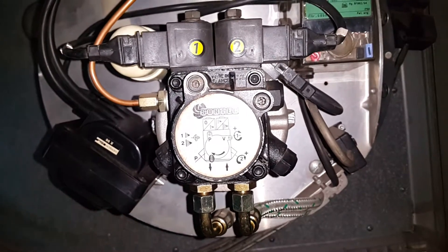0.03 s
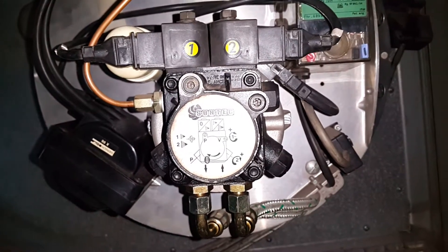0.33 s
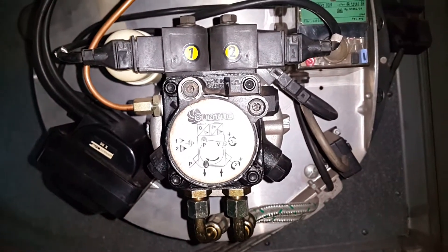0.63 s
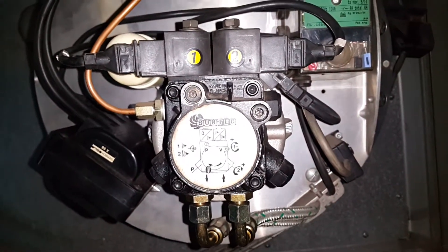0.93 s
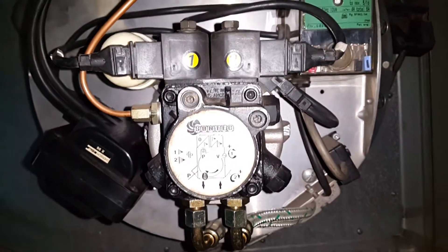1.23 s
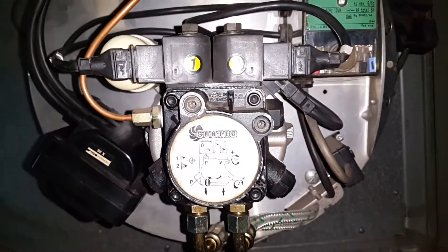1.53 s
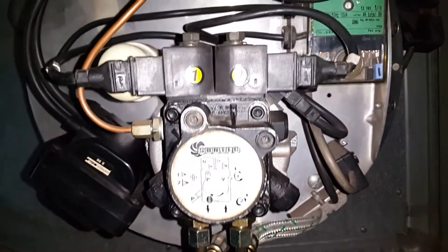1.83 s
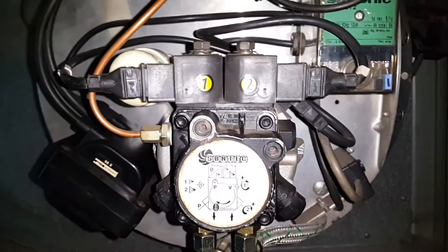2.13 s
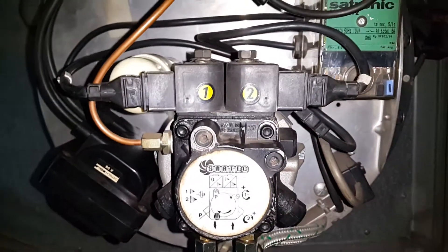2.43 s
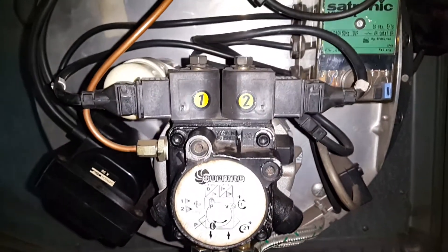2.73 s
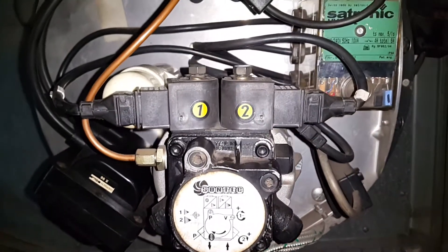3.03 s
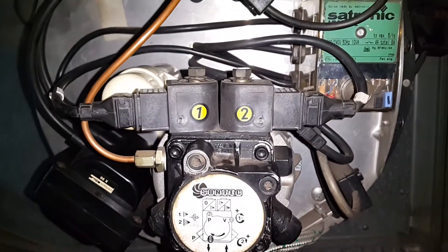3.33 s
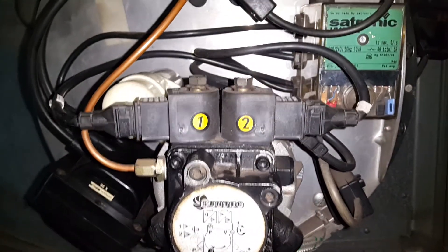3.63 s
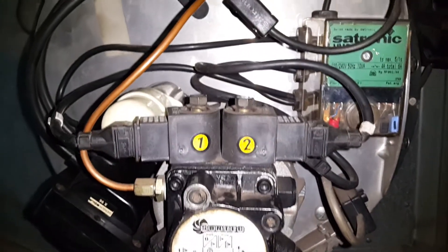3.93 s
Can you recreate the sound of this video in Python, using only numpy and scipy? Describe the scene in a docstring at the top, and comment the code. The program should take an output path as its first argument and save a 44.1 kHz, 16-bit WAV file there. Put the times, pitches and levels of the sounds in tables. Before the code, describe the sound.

Close up in a boiler room, an oil burner gives a low roar and a booming hum, with rushing air, faint whines and rapid pump ticking. The flame then falls abruptly to a low fire, leaving mostly the fan.

```python
"""A boiler room, with an oil burner running close by.
Its flame roars and makes the firebox boom near 313 Hz, then drops suddenly to a low fire at 2.85 s.
The fan rushes steadily through its housing; the motor and oil pump add thin whines and fine, fast ticks.
The right microphone faces away, and its sound gets duller after a second."""
import sys
import numpy as np
from scipy import signal
from scipy.fft import rfft, irfft
from scipy.io import wavfile

SR = 44100
rng = np.random.default_rng(int(sys.argv[2]) if len(sys.argv) > 2 else 0)


def wrap_up_sound(samples):
    """Save the sound to the file named by the first command line argument, as 16-bit audio."""
    columns = np.atleast_2d(samples).T
    # keep every value between -1 and 1, then stretch to whole-number steps
    tamed = np.clip(columns, -1, 1)
    steps = np.round(tamed * 32767).astype(np.int16)
    wavfile.write(sys.argv[1], SR, steps)


N = 176400
T, HZ = np.arange(N) / SR, np.fft.rfftfreq(N, 1 / SR)

# How strongly the fire burns: time_s, gain_db
FIRE_STRENGTH = [(0, -1), (1.0, 0), (1.6, -1.3), (2.15, 1), (2.4, -1), (2.7, 1), (2.835, 0), (2.86, -10),
                 (4, -12)]


def amp(db):
    """Turns decibels into a number to multiply by."""
    return 10 ** (np.asarray(db) / 20)


def unit(x):
    """Scales a signal to an average size (rms) of 1."""
    return x / np.sqrt(np.mean(abs(x) ** 2) + 1e-30)


def over_hz(table, column=1):
    """Reads a table's column at every frequency, joining the points on a log scale."""
    columns = np.transpose(table)
    return np.interp(np.log(HZ + 1), np.log(columns[0] + 1), columns[column])


def over_time(table):
    """Reads a table at every sample, joining the points with straight lines."""
    return np.interp(T, *np.transpose(table))


def colour(x, gain):
    """Makes each frequency louder or softer by its own gain."""
    return irfft(rfft(x) * gain, N)


def drift(rate_hz):
    """A smooth random wobble of size 1; a higher rate makes it quicker."""
    return unit(colour(rng.standard_normal(N), np.exp(-(HZ / rate_hz) ** 2) * (HZ > 0)))


def air_noise():
    """An even hiss (0 dB per Hz) at both microphones, nearly the same in the bass."""
    # How alike the two sides are, from 0 to 1: pitch_hz, likeness
    side_likeness = [(50, 0.9), (130, 0.88), (320, 1), (560, 0.85), (800, 0.9), (1300, 0), (4000, .05)]
    left, other = rng.standard_normal((2, N)) * np.sqrt(SR / 2)
    alike = np.clip(over_hz(side_likeness), 0, 1)
    right = colour(left, alike) + colour(other, np.sqrt(1 - alike ** 2))
    return np.array([left, right])


def pump_ticks():
    """The motor and pump tick strong, weak, strong, weak; the same ticks come round with each turn."""
    # Tone of a tick: pitch_hz, gain_db
    tick_tone = [(1000, -32), (4500, -3.5), (6000, 4), (6900, -3.5), (8000, -1), (9500, -13), (15000, -24)]
    first_s, pairs_per_s, decay_s = 0.0068, 115.13, 0.0004
    level_db, weak_tick_db = -58.5, -4.5
    ticks_per_turn, length = 12, 128
    fade = np.exp(-np.arange(length) / SR / decay_s)
    clicks = rng.standard_normal((ticks_per_turn, 2, length)) * fade
    ticks = np.zeros((2, N + length))
    for k, start_s in enumerate(np.arange(first_s, N / SR, 0.5 / pairs_per_s)):
        start = int(start_s * SR)
        gain_db = weak_tick_db * (k % 2) + rng.standard_normal()  # uneven by about 1 dB
        ticks[:, start:start + length] += clicks[k % ticks_per_turn] * amp(gain_db)
    return amp(level_db) * unit(colour(ticks[:, :N], amp(over_hz(tick_tone))))


def motor_whines():
    """The motor and pump sing thin tones that waver together with the speed of the shaft."""
    # One row for each whine, before the boost: pitch_hz, level_db
    whines = [(2331, -64), (2622, -61), (2744, -64.5), (3683, -60.5), (4856, -69), (5276, -64), (5776, -70),
              (5966, -75), (6007, -67), (6196, -74.5), (6428, -74), (6659, -77), (6890, -73), (7118, -77.5),
              (7386, -81.5), (7849, -79), (8080, -82), (9232, -85)]
    boost_db, speed_wobble = 7.5, 0.00043
    shaft_time = np.cumsum(1 + speed_wobble * drift(rate_hz=4.2)) / SR
    tones = np.zeros((2, N))
    for pitch_hz, level_db in whines:
        loudness = amp(level_db + boost_db + drift(rate_hz=3))  # swells and fades by about 1 dB
        cycles = pitch_hz * shaft_time + rng.random((2, 1))
        tones += loudness * np.sin(2 * np.pi * cycles)
    return tones


def fan_rush():
    """The fan blows swirling air, coloured by its housing, the room and where the microphones are."""
    # Basic tone of the rushing air: pitch_hz, level_db
    rush_tone = [(20, -93), (70, -73), (130, -55), (200, -59.5), (260, -49.5), (330, -57), (400, -63.5),
                 (500, -58.5), (680, -59.5), (800, -60), (1000, -61), (1130, -61.5), (1230, -72),
                 (1600, -69.5), (2050, -72.5), (2500, -71), (3200, -73.5), (3650, -74), (4050, -78.5),
                 (4600, -78), (5250, -76.5), (5700, -83), (6400, -91), (7500, -94.5), (8600, -96.5),
                 (9800, -92.5), (11000, -94), (11800, -97), (12400, -96.5), (14300, -99), (15600, -99)]
    # Pitches at which the housing and air ducts ring: pitch_hz, width_hz, lift_db
    housing_rings = [(360, 25, 10), (452, 15, 4), (533.5, 29, 5), (565.8, 44, 8.5), (615.4, 47, 6.5),
                     (817, 35, -3.5), (859, 50, 4.5), (1370, 106, 8), (1464, 53, 9), (1728, 41, 5),
                     (2320, 70, 1), (2620, 65, 5), (2750, 70, 0.5), (2950, 50, -0.5), (3560, 66, 2.5)]
    # How the tone changes as the microphones are raised: pitch_hz, change_db
    raised_tone = [(300, 4), (430, -0.5), (580, 0), (720, -1.5), (870, 1.5), (1150, -0.5), (1370, 1),
                   (1470, 4), (1600, -0.5), (1900, -1), (2600, -3.5), (3100, -1), (3600, 3), (4700, -3),
                   (6800, -1.5), (10000, 1)]
    # How much of that change is heard (below zero it works in reverse): time_s, share
    raised_share = [(0, -0.41), (1.8, -0.4), (2.3, 0.15), (4, 0.65)]
    ripple_size_db, ripple_step_hz, flutter_db = 0.8, 22.07, 0.44
    housing_db = sum(db / (1 + (2 * (HZ - hz) / width) ** 4) for hz, width, db in housing_rings)
    # Standing waves in the room make some pitches a little louder and others softer.
    ripples = rng.standard_normal((2, 4000))
    room = np.array([np.interp(HZ / ripple_step_hz, np.arange(len(side)), side) for side in ripples])
    rush = colour(air_noise(), amp(over_hz(rush_tone) + housing_db + ripple_size_db * room))
    tone_change = colour(rush, np.log(amp(over_hz(raised_tone))))
    rush = rush + over_time(raised_share) * tone_change
    return rush * amp(flutter_db * drift(rate_hz=25))  # swirling air makes the level flutter


def firebox_boom():
    """The flame keeps the firebox ringing: a wavering tone at full fire, mostly a noisy hum at low fire."""
    # How the boom swells and sinks, before the trim: time_s, level_db
    boom_swells = [(0.03, -11.5), (0.33, -20.5), (0.49, -11.5), (0.87, -20), (1.11, -13.5), (1.25, -19.5),
                   (1.42, -9), (1.53, -24.5), (1.81, -15), (2.09, -23), (2.34, -16.5), (2.73, -16),
                   (2.85, -36), (3.08, -23.2), (3.37, -21), (3.47, -26.5), (3.77, -20), (3.96, -24)]
    pitch_hz, wobble_hz, trim_db = 313.7, 3.76, -2.5
    width_hz, edge_hz = 22, 34
    noise_at_full_fire, noise_at_low_fire = 0.27, 0.85  # shares of the boom's power
    # Keep only the noise close to the firebox's own pitch.
    away_hz = np.fft.fftfreq(N, 1 / SR) - pitch_hz
    narrow_band = 1 / (1 + 2j * away_hz / width_hz) / (1 + (away_hz / edge_hz) ** 2)
    hum = unit(np.fft.ifft(np.fft.fft(rng.standard_normal(N)) * narrow_band).real)
    wavering_hz = pitch_hz + wobble_hz * drift(rate_hz=6.04)
    tone = unit(np.sin(2 * np.pi * np.cumsum(wavering_hz) / SR))
    fire = np.minimum(amp(over_time(FIRE_STRENGTH) + 2) ** 2, 1)  # -2 dB and up counts as full fire
    noise_share = noise_at_low_fire + (noise_at_full_fire - noise_at_low_fire) * fire
    boom = np.sqrt(1 - noise_share) * tone + np.sqrt(noise_share) * hum
    return boom * amp(over_time(boom_swells) + trim_db)


def flame_roar():
    """Oil burns in a swirling flame, making a low roar that follows the strength of the fire."""
    # Tone of the roar at full fire: pitch_hz, level_db
    roar_tone = [(20, -84.5), (38, -81.5), (48, -57), (62, -64), (78, -55), (92, -53.5), (106, -48.5),
                 (113, -51.5), (124, -45.5), (148, -41.5), (185, -46), (212, -42), (235, -43.5),
                 (257, -43.5), (278, -45.5), (298, -39.5), (335, -49.5), (356, -43), (385, -55.5),
                 (460, -56.5), (560, -55.5), (750, -74.5), (2000, -100)]
    return colour(air_noise(), amp(over_hz(roar_tone))) * amp(over_time(FIRE_STRENGTH))


def scene():
    """Adds up the burner's sounds; the right microphone hears them a little later and duller."""
    # Muffling at the right microphone: pitch_hz, open_gain_db, covered_gain_db
    muffling = [(50, 1.5, 0.5), (100, -0.5, 2), (170, -0.5, -4.5), (310, -2.5, -7), (545, -0.5, -9),
                (674, -4, -10), (855, -5.5, -13.5), (1070, -11.5, -16.5), (1220, -3, -10),
                (1420, -8, -17.5), (1750, -4, -15.5), (2100, -9.5, -15.5), (3300, -12.5, -22.5),
                (3900, -12.5, -21), (5100, -20.5, -27), (6200, -16, -24), (7800, -20, -23.5),
                (10000, -14.5, -20.5), (12500, -8, -13), (15000, -3.5, -6.5)]
    # How far that microphone is covered, from 0 to 1: time_s, share
    covering = [(0, 0.02), (.95, 0.017), (1.4, 0.82), (1.9, 0.99), (4, 1)]
    right_delay_s = 0.00017
    left, right = flame_roar() + firebox_boom() + fan_rush() + motor_whines() + pump_ticks()
    delay = np.exp(-2j * np.pi * HZ * right_delay_s)
    right_open = colour(right, delay * amp(over_hz(muffling, column=1)))
    right_covered = colour(right, delay * amp(over_hz(muffling, column=2)))
    cover = over_time(covering)
    return np.array([left, (1 - cover) * right_open + cover * right_covered])


def record(dry):
    """Cuts away the very highest treble."""
    cutoff_hz = 15760
    low_pass = signal.firwin(1023, cutoff_hz, window=("kaiser", 9), fs=SR)
    return signal.oaconvolve(dry, low_pass[None], "same")


dry = scene()
out = record(dry)
wrap_up_sound(out)
```